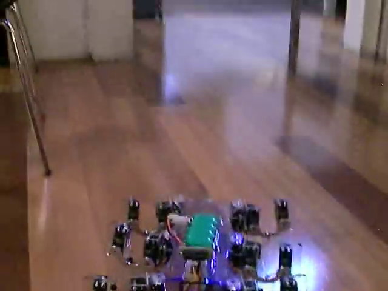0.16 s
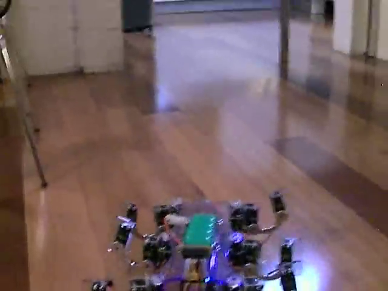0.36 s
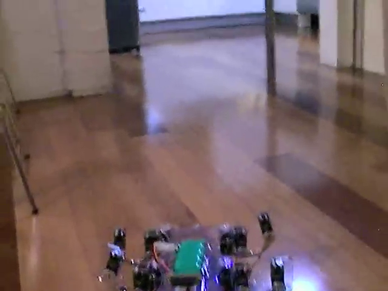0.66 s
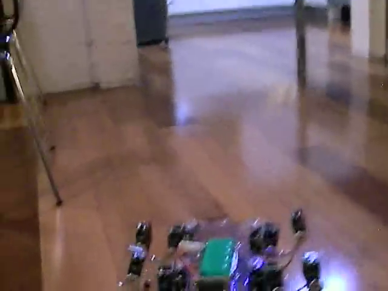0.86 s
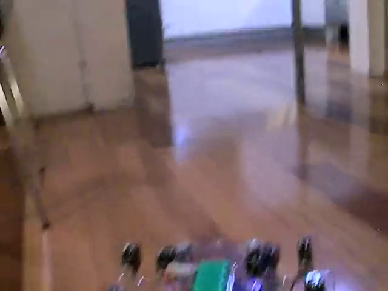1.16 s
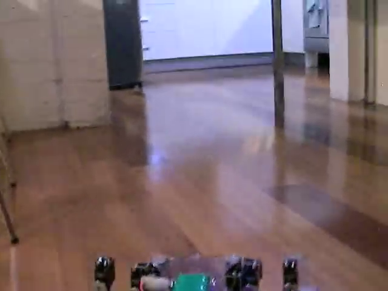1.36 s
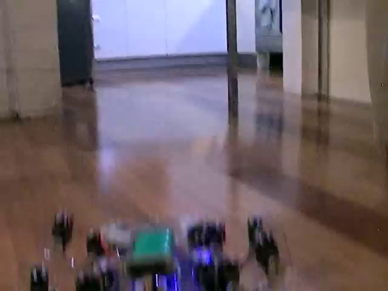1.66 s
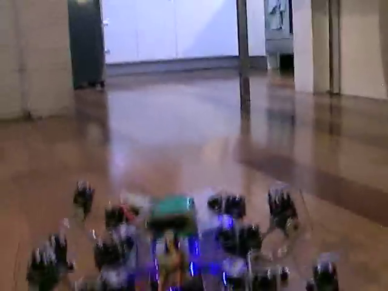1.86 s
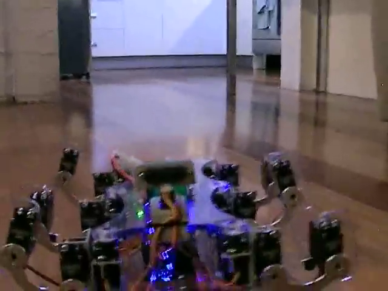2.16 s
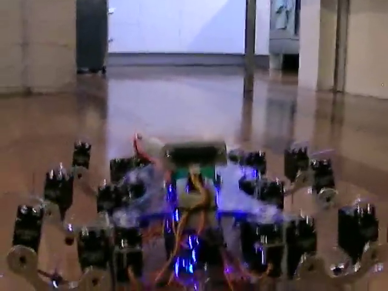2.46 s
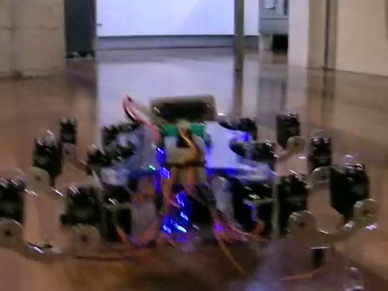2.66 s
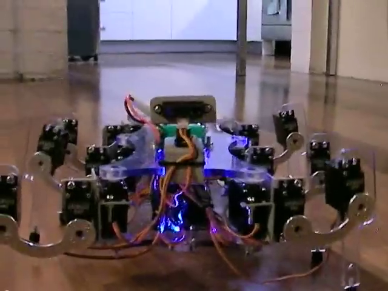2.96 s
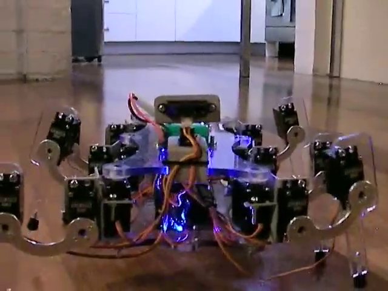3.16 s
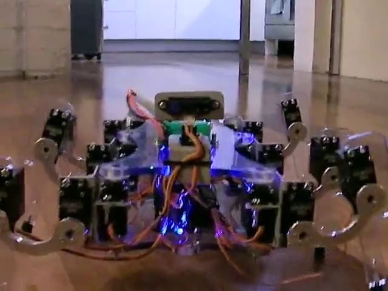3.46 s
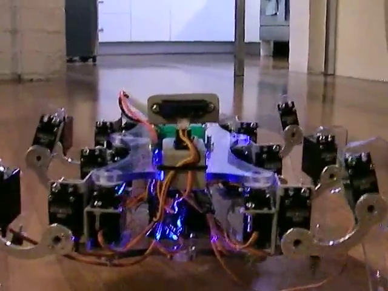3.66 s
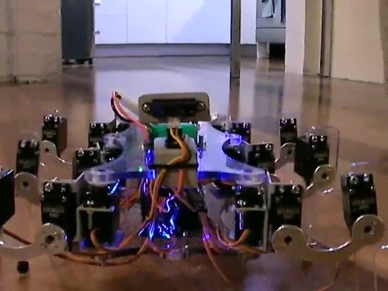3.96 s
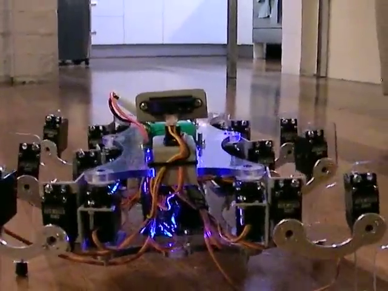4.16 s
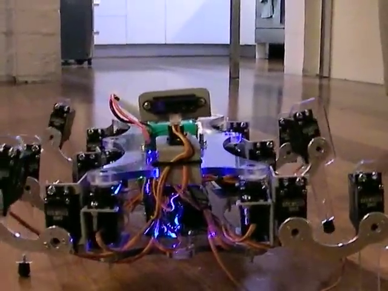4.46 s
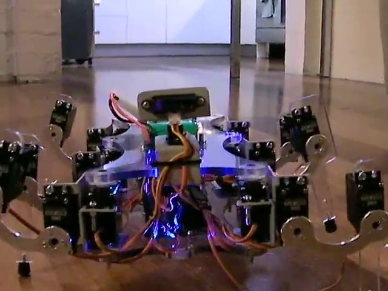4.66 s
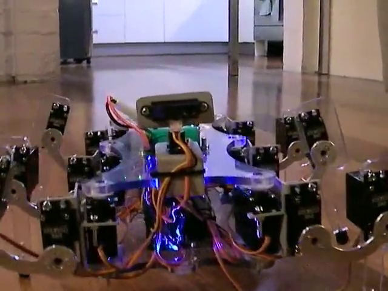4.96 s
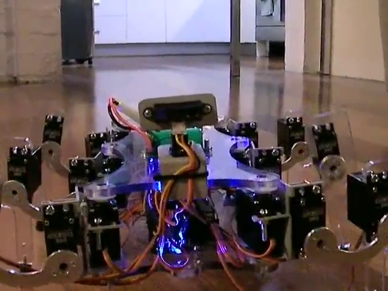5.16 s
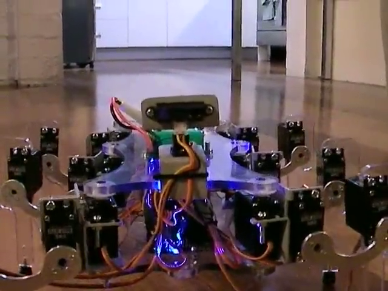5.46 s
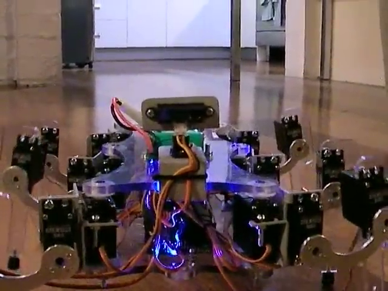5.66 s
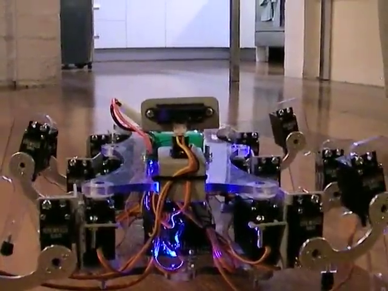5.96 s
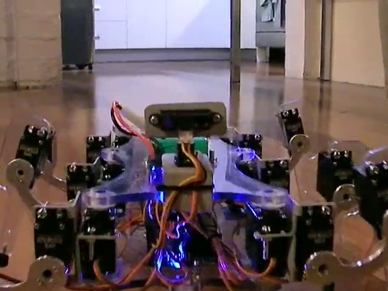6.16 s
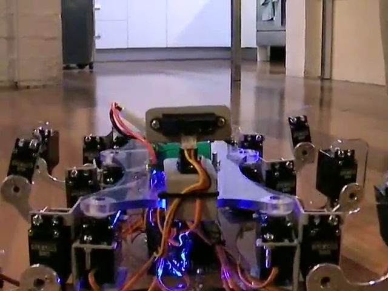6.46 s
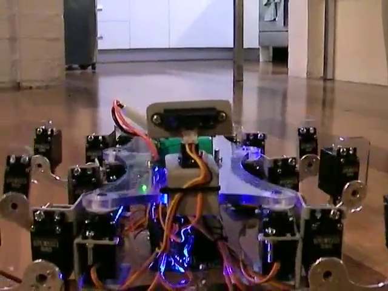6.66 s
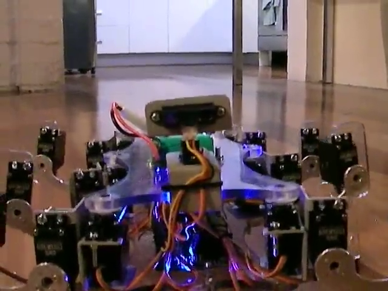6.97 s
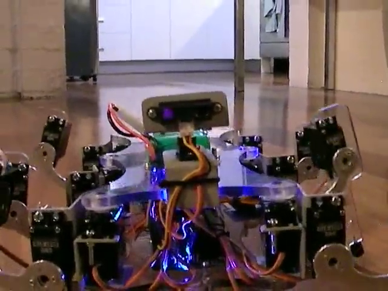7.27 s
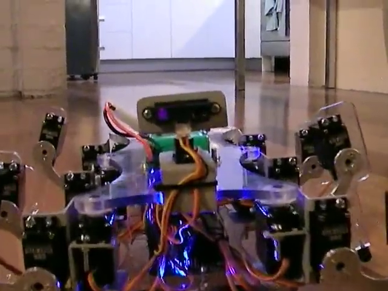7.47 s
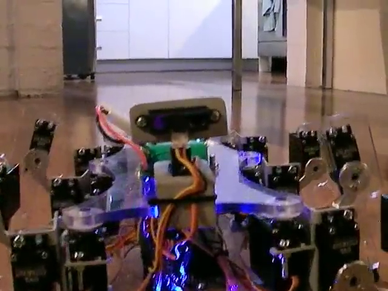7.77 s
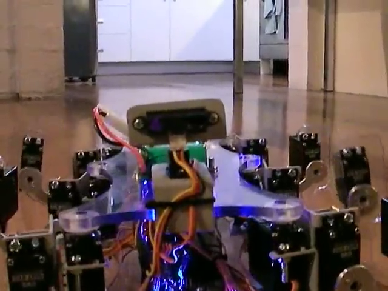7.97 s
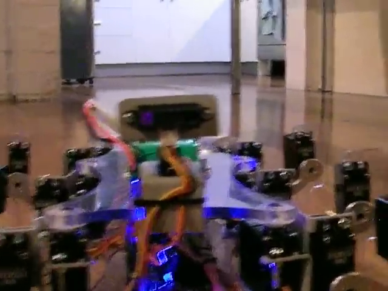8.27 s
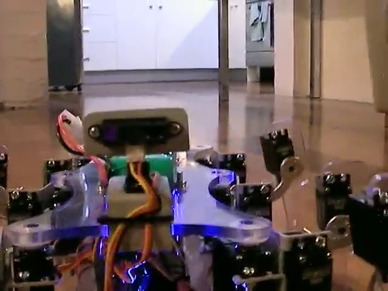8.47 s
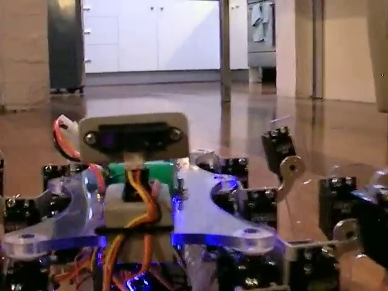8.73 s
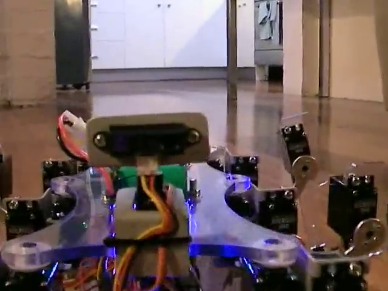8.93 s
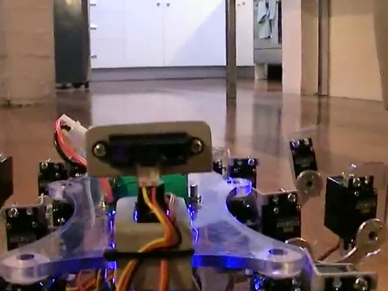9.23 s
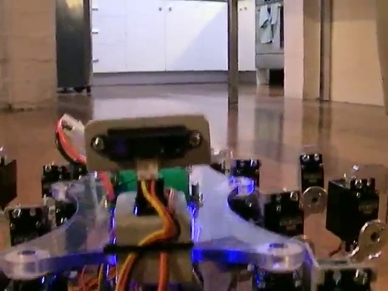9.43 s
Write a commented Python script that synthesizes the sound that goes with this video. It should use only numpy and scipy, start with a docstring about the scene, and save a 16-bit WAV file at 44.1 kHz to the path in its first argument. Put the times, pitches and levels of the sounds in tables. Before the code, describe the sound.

Handling knocks and a heavy bump give way to growing servo whirs, gritty gear rattles and light foot ticks in a hard indoor room.

```python
"""A six-legged hobby robot walks over a wooden floor towards a hand-held camera. At first fingers bump, rub and
creak on the camera case; the floor thuds, and thuds again now and then. Each stride opens with a quick whining
flick of the legs. Slow rattling pushes follow, a foot lands with a tick, and a longer whining reach comes
halfway. Loose links tick from the second stride on, and some flicks end with a tick as a leg meets its end
stop. The servos grow louder with every step, until the robot stands and only a softer buzz and room tone
remain."""
import sys
import numpy as np
from scipy import signal
from scipy.fft import rfft, irfft
from scipy.io import wavfile

SR = 44100
rng = np.random.default_rng(int(sys.argv[2]) if len(sys.argv) > 2 else 0)


def output_pcm(signal):
    """Save a mono or channel-first signal as 16-bit PCM at the path in sys.argv[1].

    Samples are clipped to [-1, 1] before scaling.
    """
    pcm = np.clip(np.atleast_2d(signal).T, -1, 1) * 32767
    wavfile.write(sys.argv[1], SR, np.round(pcm).astype(np.int16))


N = 423360
T = np.arange(N) / SR  # time of each sample, s
FREQS = np.arange(N // 2 + 1) * SR / N  # frequency of each spectrum bin, Hz

# Colour of the room's steady rumble and hiss: pitch_hz, level_db
ROOM_TONE = [(25, -34), (60, -14), (120, -4), (200, 3.5), (280, -0.5), (370, -18), (560, -20), (900, -8),
             (1300, -15.5), (2200, -16), (6000, -24.5), (13000, -32.5)]
# Dull thuds on the floorboards: start_s, level_db
THUDS = [(.630, -26.5), (1.213, -24), (1.224, -15), (2.199, -18), (2.262, -19.5), (5.243, -33.5),
         (6.691, -34.5), (7.968, -29.5), (9.405, -30.5)]
# Colour of the floorboards: pitch_hz, level_db
FLOORBOARDS = [(30, -30), (120, -6.5), (200, -3), (280, -6), (400, -19), (1000, -38), (3000, -48)]

# Fingers knocking the camera case: start_s, thump_db, click_db
KNOCKS = [(.019, -19.5, -34), (.440, -19, -28), (0.51, -21, -37), (.542, -32, -26), (.654, -22, -50),
          (0.7327, -20, -13.5), (.818, -24, -19), (1.014, -24, -28.5), (1.407, -19.5, -27),
          (1.584, -27, -20), (1.703, -22, -20.5), (1.751, -14.5, -34), (1.952, -17.5, -21),
          (2.197, -6, -13.5), (2.267, 0.5, -40), (2.445, -40, -27), (3.006, -43, -27.5), (4.487, -46, -35),
          (4.549, -34, -23.5), (4.559, -35, -13), (4.569, -37, -21), (9.569, -44, -32.5)]
# The grip shifts on the case: start_s, end_s, rub_db, creak_db
GRIP_SHIFTS = [(0.4, 0.832, -40, -48), (1.71, 1.94, -44.5, -38), (2.143, 2.6, -43, -36.5),
               (8.664, 9.542, -63, -49.5)]
# Colour of a click on the case: pitch_hz, level_db
CASE_CLICK = [(40, -24), (170, -6), (380, -8), (600, -3), (800, -4), (1150, 0.5), (1600, -9), (2300, -21),
              (6000, -33), (12000, -48)]
# Colour of a hand rubbing the case: pitch_hz, level_db
CASE_RUB = [(20, -4), (80, -1), (260, 1), (380, -11), (600, -14.5), (1250, -8), (1900, -13.5), (4000, -26)]
# The hand rubs lightly while it lowers the camera, then rests
CARRIED_S, CARRY_DB, STILL_DB = 2.96, -46.5, -61.5

# The leading foot lands, once a stride: start_s, level_db
FOOTFALLS = [(1.4153, -25.5), (4.113, -20.5), (6.8339, -21.5)]
BOUNCE_S, BOUNCE_DB, FOOT_BODY_DB = .02, -7, -7.5  # bounce delay and relative level; duller part of the step
# Loose links tick as the weight shifts, and a leg hits its end stop as a flick ends (3.405 s, 8.853 s):
# start_s, level_db, body_db (relative to level_db)
TICKS = [(2.8106, -31.5, -1), (3.405, -27, -4), (5.1345, -32, -9), (5.2129, -30, -3),
         (5.2769, -29, -11), (5.5483, -31, -1), (6.373, -33, 6), (7.8262, -28.5, 2), (7.944, -26, -10),
         (8.0649, -29, -11), (8.1798, -29.5, -2), (8.217, -28.5, -12), (8.57, -41.5, 10.5),
         (8.853, -27.5, -3)]

STRIDE_S, STOP_S = 2.71, 9.5  # length of a gait cycle; the robot stands still from here on
NEARING_DB_PER_S, MIDWAY_S = 0.69, 4.86  # servos grow louder as the robot nears; levels are given for midway
FRAME_HZ = 50  # control frames per second: each sends a kick of current to a servo

# Gearbox of a servo under standing load: pitch_hz, level_db
STRAIN = [(1200, -23), (2300, -6), (3000, 0), (3400, -2), (4000, -1), (5100, -3.5), (6500, -12.5),
          (7500, -24.5), (13500, -13.5)]
# Resonances of the chassis plate: pitch_hz, width_hz, level_db
CHASSIS = [(1408, 213, 1.5), (1940, 680, -9)]
HOLD_DB, PLATE_DB = -43.5, -52.5  # standing buzz of the gearboxes and of the chassis
HOLD_NEARING = 0.46  # share of the rise with nearness
REST_S, REST_DB = 0.24, -3  # the load eases just before each swing, and once the robot stands
SETTLE_S, SETTLE_DB = 0.054, 2  # the servos hunt for their place after a flick

# The four slow pushes of a stride: delay_s (after the flick starts), length_s, gearbox_db,
# upper_gearbox_db, fizz_db (motor)
PUSHES = [(0.475, .315, -42.5, -40, -53), (0.903, .31, -42, -42.5, -57.5), (1.805, .29, -46.5, -41, -49.5),
          (2.26, .3, -41.5, -43, -56)]
# Shares of the rise with nearness: gearbox, upper gearbox, motor fizz (no units)
PUSH_NEARING = (0.84, 0.88, 0.83)
# Colour of the gearbox rattle: pitch_hz, level_db
RATTLE = [(1000, -46), (2250, -11.5), (2750, -1), (3150, -5), (3600, -2.5), (4150, -1), (4800, -9),
          (7000, -39.5)]
# Colour of the upper part of the rattle: pitch_hz, level_db
RATTLE_TOP = [(2800, -27.5), (4200, -5.5), (5050, 3), (5600, -1.5), (6400, -1.5), (7100, -15.5),
              (8500, -16)]
# Colour of the motor fizz: pitch_hz, level_db
FIZZ = [(6000, -73), (8500, 1.5), (9300, 0.5), (9900, 5.5), (10900, 3.5), (12100, 6), (13300, 5.5),
        (14500, -9)]

# Gear stages that sing out in each move of a kind: move, delay_s, length_s, pitch_hz,
# level_db (over the motor fizz of the move)
SQUEALS = [("flick", .01, .17, 9920, -6), ("flick", .005, 0.16, 6250, -7),
           ("flick", .005, .35, 3030, -10.5), ("reach", 0.024, .1, 3780, -2.5),
           ("reach", .12, .14, 4780, -2.5), ("reach", .03, .24, 11400, -6), ("reach", .06, .22, 12100, -4),
           ("reach", .12, .16, 13000, -2), ("first push", .03, .26, 5050, 5),
           ("second push", .04, .27, 3600, 17.4)]
# Quick flicks of the legs that open each stride: start_s, length_s, gear_db, fizz_db, whine_db,
# whine_hz (at top speed), top_speed_s (after the start)
FLICKS = [(0.509, .17, -39.5, -45.5, -46, 3900, 0.071), (3.208, .17, -38.5, -38.5, -29.5, 4000, 0.048),
          (5.902, .21, -36.5, -37, -29, 3850, 0.054), (8.651, 0.16, -34, -34, -28, 3910, 0.034)]
# Longer reaches halfway through a stride: the same columns as the flicks
REACHES = [(2.026, 0.24, -40, -42, -40, 5596, .075), (4.72, 0.31, -41, -38.5, -37, 5800, .235),
           (7.444, .285, -40, -35.5, -38.5, 5560, .06)]
# Colour of the gears at full speed: pitch_hz, level_db
WHIR = [(1000, -28), (2400, -9.5), (3000, 1), (3700, 3.5), (4400, -0.5), (5700, 0.5), (6500, 2.5),
        (7200, -2.5), (9000, -41)]
# How unlike the two microphones hear the robot: pitch_hz, side_db (relative to mid)
WIDTH = [(2800, -28), (3800, -10), (5800, -3.5), (7500, -7), (13000, -4.5)]


def undb(db):
    """Turn decibels into a gain."""
    return np.exp(np.asarray(db) * np.log(10) / 20)


def unit(x):
    """Scale to an rms of 1."""
    return x / np.sqrt(np.mean(x ** 2))


def colour(x, points):
    """Filter x to the given (Hz, dB) curve, with no sound ahead of its cause."""
    hz, db = np.transpose(points)
    curve_db = np.interp(np.log(FREQS + 1), np.log(hz), db)
    # folding the cepstrum forwards in time gives the minimum-phase filter
    cepstrum = irfft(np.log(undb(curve_db)), N)
    cepstrum[1:N // 2] *= 2
    cepstrum[N // 2 + 1:] = 0
    return irfft(rfft(x) * np.exp(rfft(cepstrum)), N)


def walk(rate):
    """Random wander with a spread near 1, drawn as lines between `rate` random points a second."""
    knots = np.arange(0, T[-1] + 2 / rate, 1 / rate) - rng.random() / rate
    return 1.2 * np.interp(T, knots, rng.standard_normal(len(knots)))


def gate(start, end, rise, fall):
    """1 from start to end, with ramps of the given lengths centred on both."""
    return np.clip((T - start) / rise + .5, 0, 1) * np.clip((end - T) / fall + .5, 0, 1)


def stereo(mid, side):
    """Left and right from the shared part (mid) and the opposite part (side)."""
    return np.array([mid + side, mid - side])


def impacts(times, db):
    """One single-sample impulse for each blow."""
    out = np.zeros(N)
    places = np.clip(np.round(np.asarray(times) * SR).astype(int), 0, N - 1)
    np.add.at(out, places, undb(db))
    return out


def tail(t60):
    """Noise of unit energy that dies by 60 dB in t60 seconds: a dense cloud of reflections or modes."""
    ring = rng.standard_normal(N) * undb(-60 * T / t60)
    return ring / np.linalg.norm(ring)


def convolve(x, response):
    """Let every impulse in x set off the response (its first second)."""
    return signal.fftconvolve(x, response[:SR])[:N]


def blow(spectrum, t60, tail_db):
    """Response to one hard blow, peak 1: a coloured pulse and its dying ring."""
    response = colour((T == 0) + undb(tail_db) * tail(t60), spectrum)
    return response / np.abs(response).max()


def bump(hz, width, spectrum, t60, rumble_db):
    """Response to a soft blow: a couple of deep swings, then a faint rumble."""
    since = T - width
    swing = np.sin(2 * np.pi * hz * since) * np.exp(-(since / width) ** 2)
    rumble = colour(tail(t60), spectrum)
    return swing + undb(rumble_db) * rumble / np.abs(rumble).max()


def room_tone():
    """A low steady rumble with faint hiss, made of coloured noise."""
    mid, side = unit(colour(rng.standard_normal((2, N)), ROOM_TONE))
    return stereo(mid * undb(-53.5 + 0.66 * walk(16)), side * undb(-50.0))


def thuds():
    """The floorboards give under a weight, swing deeply and rumble out."""
    thud = bump(hz=208, width=0.00424, spectrum=FLOORBOARDS, t60=0.4, rumble_db=-9.5)
    boom = convolve(impacts(*np.transpose(THUDS)), thud)
    return stereo(boom, 0.08 * boom)


def grip():
    """Strength of rubbing and creaking: light while the camera moves, stronger at each shift of the hand."""
    light = undb(STILL_DB) + undb(CARRY_DB) * gate(-np.inf, CARRIED_S, rise=1, fall=0.43)
    gates = np.array([gate(start, end, rise=0.017, fall=0.16) for start, end, *_ in GRIP_SHIFTS])
    shift_gains = undb(np.array(GRIP_SHIFTS)[:, 2:]).T
    return light + shift_gains @ gates


def handling():
    """The camera case shakes its two microphones in opposite senses; fingers creak around each knock."""
    s, thump_db, click_db = np.transpose(KNOCKS)
    # the case bounces on the fingertip, and the whole hand gives more slowly
    bounce = bump(hz=177, width=0.0028, spectrum=CASE_RUB, t60=.1, rumble_db=-35)
    give = bump(hz=85, width=.005, spectrum=CASE_RUB, t60=.1, rumble_db=-8)
    thumps = convolve(impacts(s, thump_db), bounce + .42 * give)
    rubbing, creaking = grip()
    # small slips of the skin, 120 a second, cluster round the knocks and follow the grip
    near_knock = sum(undb(db) * np.exp(-np.abs(T - at) / 0.014) for at, db in zip(s, click_db))
    slip_strength = .18 * near_knock + .8 * creaking
    slips = (rng.random(N) < 120 / SR) * rng.standard_normal(N) * slip_strength
    clicks = impacts(s, click_db) + slips
    knocks = thumps + convolve(clicks, blow(CASE_CLICK, t60=0.019, tail_db=-2))
    airborne = convolve(clicks, blow(CASE_CLICK, t60=0.043, tail_db=10.5))
    unevenness = undb(4 * walk(45) + 2 * walk(12))
    rub = unit(colour(rng.standard_normal((2, N)) * unevenness, CASE_RUB)) * rubbing
    mid = 0.18 * knocks + 0.44 * airborne + .5 * rub[0]
    return stereo(mid, knocks + rub[1])


def ticks():
    """Hard feet land and bounce once, loose links and end stops tick; a small metal part rings briefly."""
    foot_s, foot_db = np.transpose(FOOTFALLS)
    feet = impacts(foot_s, foot_db) + impacts(foot_s + BOUNCE_S, foot_db + BOUNCE_DB)
    link_s, link_db, body_db = np.transpose(TICKS)
    links = impacts(link_s, link_db)
    ping = 0.11 * np.sin(2 * np.pi * 9920 * T) * undb(-60 * T / 0.13)
    sharp = convolve(feet + links, blow(FIZZ, t60=.024, tail_db=16) + ping)
    body_blows = feet * undb(FOOT_BODY_DB) + impacts(link_s, link_db + body_db)
    body = convolve(body_blows, blow(WHIR, t60=0.017, tail_db=27))
    return sharp + body


def nearing_db(s):
    """Rise in level as the robot walks closer: zero at midway."""
    return NEARING_DB_PER_S * (s - MIDWAY_S)


def teeth(rate):
    """Gear-tooth impacts, `rate` a second, of uneven size and spacing, as mid and side."""
    hits = rng.random((2, N)) < rate / SR
    return unit(hits * rng.choice([-1, 1], (2, N)) * (1 + rng.random((2, N))))


def drive(depth, slip, count=4):
    """Each servo gets one kick of current per control frame and coasts until the next."""
    kicks = 0
    for _ in range(count):
        frame = FRAME_HZ * T + rng.random() + slip * walk(14)
        kicks = kicks + np.exp(-(frame % 1) / 0.4) * undb(4.8 * walk(30))
    return unit(1 + depth * kicks)


def load_db():
    """Standing load: eases before each swing and at the stop, and overshoots after a flick."""
    resting = sum(gate(s - REST_S, s, rise=0.36, fall=0.03) for s, *_ in FLICKS + REACHES)
    resting = resting + gate(STOP_S, np.inf, rise=0.069, fall=1)
    settling = sum(gate(s + length, s + length + SETTLE_S, rise=.05, fall=0.18)
                   for s, length, *_ in FLICKS)
    return REST_DB * resting + SETTLE_DB * settling


def holding():
    """Servos that hold their place buzz in their gearboxes and through the chassis plate."""
    chatter = teeth(rate=7000) * drive(depth=0.46, slip=.15)
    resonance = sum(undb(db) / (1 + 1j * (FREQS ** 2 - hz ** 2) / (width * FREQS + 1))
                    for hz, width, db in CHASSIS)
    ringing = irfft(rfft(chatter) * resonance, N)
    plate = unit(colour(ringing, [(400, -24), (1200, -6), (2200, -2), (6000, -12.5)]))
    gearboxes = unit(colour(chatter, STRAIN))
    buzz = plate * undb(PLATE_DB + walk(5.9)) + gearboxes * undb(HOLD_DB + load_db())
    return buzz * undb(HOLD_NEARING * nearing_db(T))


def repeated(push):
    """One push in every stride until the robot stops: rows (start, length, three levels)."""
    delay, length, *levels = push
    # the stride before the first flick is already under way
    strides = [FLICKS[0][0] - STRIDE_S] + [flick[0] for flick in FLICKS]
    rows = []
    for stride in strides:
        start = stride + delay
        if 0 < start < STOP_S:
            rows.append((start, length, *(np.array(levels) + np.array(PUSH_NEARING) * nearing_db(start))))
    return rows


def pushing():
    """Slow, loaded servos: backlash (play between the teeth) rattles the gearboxes with every kick."""
    rows = np.array([row for push in PUSHES for row in repeated(push)])
    gates = np.array([gate(start, start + length, rise=0.13, fall=0.081) for start, length, *_ in rows])
    levels = undb(rows[:, 2:]).T @ gates
    kicks = drive(depth=.8, slip=.4)
    layers = [unit(colour(teeth(rate=11000), body)) for body in (RATTLE, RATTLE_TOP, FIZZ)]
    return kicks * sum(layer * level for layer, level in zip(layers, levels))


def whining(hz):
    """Tooth-to-tooth errors spread a gear tone into a narrow, rough, chattering band."""
    wobble_hz = 45 * walk(30) + 125 * walk(900)
    tone = np.cos(2 * np.pi * np.cumsum(hz + wobble_hz) / SR)
    roughness = 1 + 1.1 * walk(600)
    return unit(tone * roughness * undb(1.5 * walk(40)))


def squeals(scatter=.005, sag=0.01475):
    """Single gear stages sing out at the same point of each move, sagging in pitch as the load grows."""
    # each move: its start and its motor fizz level
    moves = {"flick": [(row[0], row[3]) for row in FLICKS],
             "reach": [(row[0], row[3]) for row in REACHES],
             "first push": [(row[0], row[-1]) for row in repeated(PUSHES[0])],
             "second push": [(row[0], row[-1]) for row in repeated(PUSHES[1])]}
    out = np.zeros(N)
    for move, delay, length, hz, db in SQUEALS:
        gain, pitch = np.zeros(N), np.zeros(N)
        for s, fizz_db in moves[move]:
            on = gate(s + delay, s + delay + length, rise=0.033, fall=0.045)
            now = on > 0
            progress = (T[now] - s - delay) / length - .5
            pitch[now] = hz * (1 + scatter * rng.uniform(-1, 1) - sag * progress)
            gain += on * undb(fizz_db + db)
        out += whining(pitch) * gain
    # the side signal is a weaker copy, three samples late
    return np.array([out, .7 * np.roll(out, 3)])


def mesh(hz, count, patchy_db):
    """Tone of a meshing gear pair: overtones of a tooth rate that wavers with the load."""
    wobble = .016 * walk(35) + .014 * walk(600)
    phase = 2 * np.pi * (np.cumsum(hz * (1 + wobble)) / SR % 1).astype(np.float32)
    return unit(sum(np.cos(k * phase) * undb(patchy_db * walk(22)) for k in range(1, count + 1)))


def swing_controls(rows, attack_s, release_s, gear_db_per_s, fizz_db_per_s,
                   crest_s, spin_up_per_s, sag_per_s):
    """Gear, fizz and whine gains and whine pitch: levels slope, the whine crests at top speed."""
    out = np.zeros((4, N))
    for start, length, gear_db, fizz_db, whine_db, hz, top_s in rows:
        on = gate(start, start + length, rise=attack_s, fall=release_s)
        now = on > 0
        age = T[now] - start
        from_middle = age - length / 2
        crest = np.exp(-np.abs(age - top_s) / crest_s)
        out[0, now] = on[now] * undb(gear_db + gear_db_per_s * from_middle)
        out[1, now] = on[now] * undb(fizz_db + fizz_db_per_s * from_middle)
        out[2, now] = on[now] * undb(whine_db) * crest
        # the pitch climbs up to top speed, then sags
        out[3, now] = hz * (1 + np.minimum(spin_up_per_s * (age - top_s), sag_per_s * (top_s - age)))
    return out


def swings(count=3):
    """Three legs swing at full speed: gear tones and tooth hash, motor fizz, and one whine on top."""
    # a flick starts hard and fades; a reach swells
    flicks = swing_controls(FLICKS, attack_s=.005, release_s=0.036, gear_db_per_s=-32, fizz_db_per_s=-30,
                            crest_s=.035, spin_up_per_s=1.5, sag_per_s=1.1)
    reaches = swing_controls(REACHES, attack_s=.03, release_s=.025, gear_db_per_s=8, fizz_db_per_s=13,
                             crest_s=0.19, spin_up_per_s=.35, sag_per_s=.9)
    gear_gain, fizz_gain, whine_gain, whine_hz = flicks + reaches
    # every leg's motor hunts around its own speed, in teeth per second
    speeds = [1750 * (1 + .09 * (leg - 1) + .02 * walk(9)) for leg in range(count)]
    tones = np.array([sum(mesh(speed, count=8, patchy_db=5.0) for speed in speeds)
                      for _ in ("mid", "side")])
    source = unit(tones) + .7 * teeth(rate=12000)
    whir = unit(colour(source, WHIR)) * gear_gain
    fizz = unit(colour(source, FIZZ)) * fizz_gain
    # mid and side whine separately
    whine = np.array([whining(whine_hz), .5 * whining(whine_hz)]) * whine_gain
    return whir + fizz + whine


def scene():
    """The robot close by, its reflections from the hard room, and the hand-held camera."""
    mid, side = pushing() + holding() + swings() + squeals() + np.array([ticks(), ticks()])
    robot = stereo(mid, colour(side, WIDTH))
    walls = np.array([convolve(mid, tail(t60=0.41)) for _ in range(2)])
    return robot + undb(-9.0) * walls + handling() + thuds() + room_tone()


def record(dry):
    """The camera rounds the loudest bump, has a narrow notch in the treble and cuts the top steeply."""
    rounded = .85 * np.tanh(dry / .85)
    notch_hz, half_width_hz, top_hz = 7950, 480, 13600
    notch = signal.butter(3, [notch_hz - half_width_hz, notch_hz + half_width_hz], "bandstop",
                          fs=SR, output="sos")
    top = signal.ellip(10, .2, 75, top_hz, fs=SR, output="sos")
    return signal.sosfilt(np.vstack([notch, top]), rounded)


dry = scene()
out = record(dry)
output_pcm(out)
```